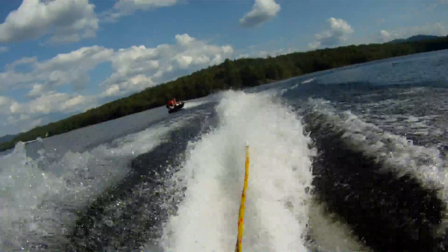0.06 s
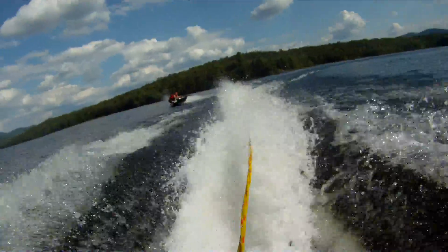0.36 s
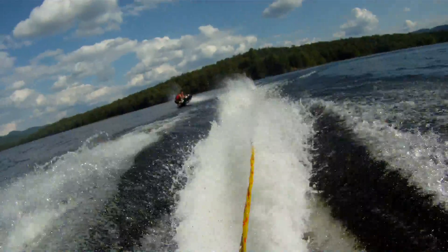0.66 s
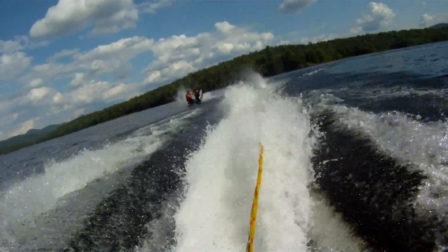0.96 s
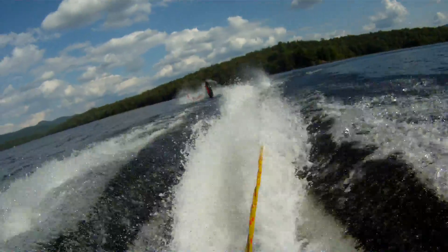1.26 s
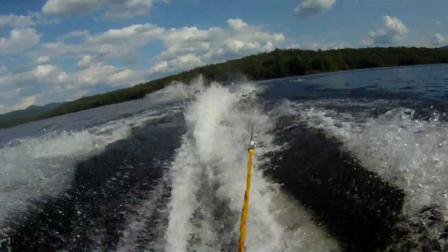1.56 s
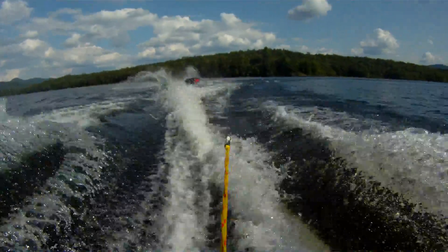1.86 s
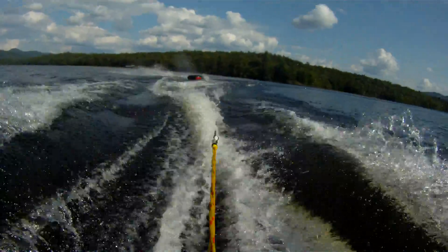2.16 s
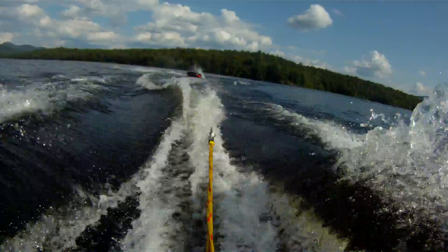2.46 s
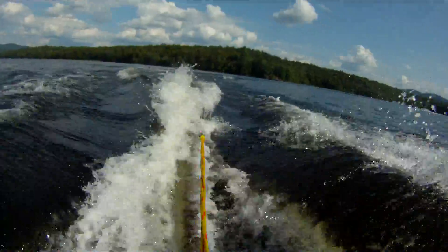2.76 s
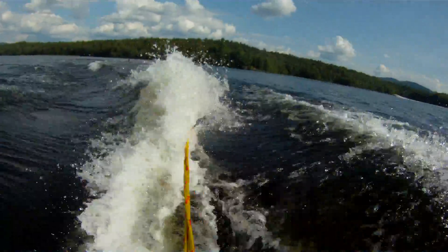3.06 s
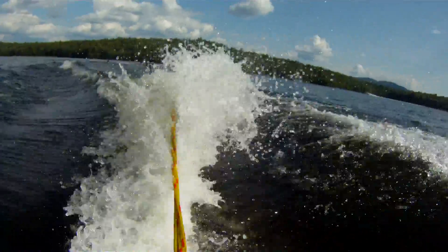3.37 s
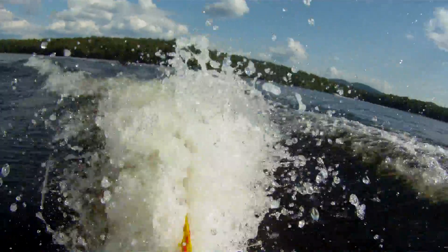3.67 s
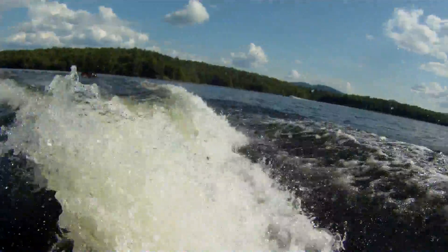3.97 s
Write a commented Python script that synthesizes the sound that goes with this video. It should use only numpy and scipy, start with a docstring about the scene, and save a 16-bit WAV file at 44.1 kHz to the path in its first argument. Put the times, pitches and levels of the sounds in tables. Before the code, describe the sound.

A personal watercraft roars at full throttle, eases off, and drones low over churning water.

```python
"""A personal watercraft runs on a lake, heard from a cased camera on its stern. At full throttle, engine and
jet roar over a hull drone, overloading the microphone; the case rattles once a shaft turn. At 0.65 s the craft
leans into a turn. Near 1.3 s the throttle closes: uneven firings burble in the wet exhaust, the wake washes and
slaps the hull, spray fizzes. From 2.3 s the engine picks up, reaching a low drone by 3.5 s while the plume
churns and drops tap the case."""
import sys
import numpy as np
from scipy.fft import rfft, irfft, next_fast_len
from scipy.io import wavfile
from scipy.ndimage import uniform_filter1d, map_coordinates

SR = 44100
rng = np.random.default_rng(int(sys.argv[2]) if len(sys.argv) > 2 else 0)


def store_pcm(level_fs):
    """Save levels as 16-bit WAV."""
    pcm = np.round(np.clip(level_fs, -1, 1) * 32767).astype(np.int16)
    wavfile.write(sys.argv[1], SR, np.atleast_2d(pcm).T)


N = 176400
TIME_S = np.arange(N) / SR

# Engine speed, full throttle and after. Each row: time in seconds, firing rate in Hz.
FIRING_FAST_HZ = [(0.1, 160.2), (0.2, 161.3), (0.3, 162.4), (0.42, 162.8), (0.55, 162.4), (0.68, 160.5),
                  (0.95, 159.3), (1.1, 157.6), (1.18, 154.8), (1.24, 149.5), (1.29, 145.7)]
FIRING_SLOW_HZ = [(1.34, 144), (1.4, 100), (1.49, 80), (1.6, 63), (1.8, 50), (2.05, 45.8), (2.25, 45.2),
                  (2.5, 51), (2.8, 54.5), (3.1, 62), (3.3, 69.6), (3.5, 83), (3.72, 82), (4, 82.4)]

# Envelopes. Each row: time in seconds, level in dB.
ROAR_DB = [(0, -19), (.332, -23), (.576, -20), (1.225, -20), (1.28, -20), (1.32, -26), (1.42, -35)]
RATTLE_DB = [(0, -47), (.15, -42.5), (.28, -40), (.5, -38), (.62, -48), (1.25, -61), (1.35, -77)]
FIRING_NOTE_DB = [(0, -22.5), (.45, -23), (1.1, -25.5), (1.26, -36), (1.35, -32.5), (1.43, -28.5),
                  (1.5, -29), (1.58, -50), (1.75, -46), (2.1, -57), (2.7, -50), (3.25, -37.5), (3.5, -29.5),
                  (3.75, -26.5), (4, -26.5)]
HULL_DB = [(0, -22), (.5, -23.5), (.65, -21), (1.25, -20), (1.31, -25), (1.38, -54), (1.6, -92)]
HOWL_DB = [(0, -32), (.11, -28), (.22, -35), (.42, -32), (.53, -34), (.61, -24.5), (.71, -24), (1.1, -24),
           (1.21, -22.5), (1.29, -26.5), (1.34, -40), (1.45, -70)]
PICKUP_DB = [(1.3, -77), (1.42, -40.5), (1.52, -39), (1.65, -61), (3, -74), (3.3, -51), (3.55, -38),
             (4, -41)]
CHURN_DB = [(0, -65), (1.3, -60), (1.7, -53), (2.6, -44), (3.2, -39.5), (3.6, -34.5), (4, -36)]
# Water envelopes. Each row: time in seconds, level in dB relative to the layer's gain.
WASH_DB = [(1.45, -37.5), (1.78, -41.5), (2.45, -41), (4, -35)]
SPRAY_DB = [(1.45, -48.5), (2.18, -52), (2.59, -50.5), (3.36, -46.5), (4.0, -50.5)]

# Noise spectra. Each row: frequency in Hz, relative level in dB.
ROAR_SPECTRUM = [(650, -31), (1100, -8), (1270, -24), (1620, 3), (1830, -4.5), (2230, 1.5), (2410, -2.5),
                 (2610, -2), (2880, -9.5), (3440, -14.5), (3840, -13.5), (4150, -16.5), (4790, -18.5),
                 (6200, -22.5), (7400, -29.5), (7950, -22.5), (9000, -30.5), (12800, -38.5), (14700, -39),
                 (15500, -44)]
ROAR_BODY_SPECTRUM = [(35, -30), (70, -26), (130, -10), (200, -8), (300, -16.5), (370, -16.5), (470, 5),
                      (560, -4), (650, -15), (880, 0), (1100, -8), (1400, -5)]
RATTLE_SPECTRUM = [(2000, -16), (4000, -3), (6500, 1), (8500, -10), (9700, 2.5), (10800, -9), (12000, -8.5),
                   (13000, -17), (15500, -18)]
BOOM_SPECTRUM = [(30, -23), (55, -21), (74, -0.5), (90, -4), (105, -6), (130, -14), (170, -10)]
CASE_TAP_SPECTRUM = [(800, -12), (2200, 3), (3400, 0), (4400, -2), (5400, 2), (7000, -3), (15000, -18)]
WASH_SPECTRUM = [(160, -52), (280, -15), (331, -18), (386, -22), (480, 2), (552, -4), (589, -2), (620, -38),
                 (742, 2), (791, -11.5), (854, -1.5), (959, -6.5), (1210, -9), (1360, -9.5), (1500, -1),
                 (1650, 7.5), (1820, -8.5), (1990, 1), (2130, -2), (2330, -1.5), (2610, -1.5), (2890, -16),
                 (3550, -11), (4140, -19.5), (4640, -16.5), (6000, -46), (7800, -50), (13200, -120)]
CHURN_SPECTRUM = [(150, -51), (300, -1), (400, -9.5), (850, 0.5), (1300, 1), (1620, 3), (1900, -2),
                  (2550, 2), (4000, -19)]
SPRAY_SPECTRUM = [(2940, -20), (5000, 0), (6100, -4), (7100, -6.5), (7800, -9), (10000, -10.5),
                  (11700, -12), (12600, -17), (14700, -17), (15500, -21)]

# Hull partials. Each row: shaft multiple, gain in dB on the level run, gain in dB leaning into the turn.
HULL_PARTIALS = [(1, -9.5, -9.5), (3, -9.5, -9.5), (4, -20.5, -27), (5, -21, -22), (7, -12, -13.5),
                 (8, -24, -20), (9, -19, -14), (10, -14, -17.5), (11, -10, -18.5), (13, -11.5, -20),
                 (14, -17, -17.5), (15, -33, -17.5), (17, -23, -19), (20, -26, -12.5)]
# Low drone at mid speed. Each row: multiple of the firing rate, gain in dB.
PICKUP_PARTIALS = [(2, 1.5), (3, -10.5), (4, -11), (5, -16.5), (6, -6.5), (10, -20)]
# Flares of the case resonance. Each row: centre in seconds, level in dB.
FLARES = [(.91, -18), (1.294, -18.5)]
# Off-throttle exhaust. Each row: time in seconds, burble level in dB, boom level in dB.
EXHAUST_DB = [(1.2, -55, -70), (1.33, -31, -53), (1.5, -40.5, -31.5), (1.65, -42, -42.5), (1.9, -35, -36),
              (2.42, -34.5, -36.5), (2.6, -42, -37), (3.1, -45, -38), (3.35, -44.5, -45),
              (3.55, -40.5, -42), (4, -54, -38)]
# Exhaust pipe modes. Each row: frequency in Hz, width in Hz, gain in dB.
PIPE_MODES = [(167, 23, 4.5), (231.6, 17.8, 2), (479.6, 49, -8.5), (744, 19, -27)]
# Scatter of firing strength. Each row: time in seconds, spread in dB.
FIRING_SPREAD_DB = [(1.3, -0.5), (1.7, 2.5), (2.9, -2.5), (3.5, 13)]
# Wake slaps on the hull. Each row: centre in seconds, rise of the wash in dB.
SLAPS = [(1.54, 1.5), (1.82, 2), (2.11, 4), (2.32, 2), (2.46, 4), (2.57, 3.5), (2.67, 2.5), (2.98, 2.5),
         (3.04, 3)]
# Drops on the case. Each row: start in seconds, peak in dB, treble edge in Hz.
DROPS = [(1.7298, -21.5, 7500), (3.138, -32, 15000), (3.318, -27, 8000), (3.4055, -17, 5900),
         (3.437, -27, 6000)]
# Peaks and hollows of the case. Each row: centre in Hz, width in Hz, gain in dB.
CASE_BANDS = [(1230, 45, 2), (2450, 45, -6), (3630, 110, 3), (4750, 130, 2), (6600, 200, -3),
              (8100, 160, -3), (9300, 300, -3.5), (11000, 220, -4)]
# Jet pump whine. Each row: shaft multiple, gain in dB.
PUMP_PARTIALS = [(49, -24), (60, -26)]


def amp(db):
    """Decibels to gain."""
    return 10 ** (np.asarray(db) / 20)


def unit(x):
    """x at rms 1."""
    return x / np.sqrt(np.mean(x ** 2) + 1e-20)


def curve(rows, column=1):
    """One column of a timed table, per sample."""
    rows = np.array(rows)
    return np.interp(TIME_S, rows[:, 0], rows[:, column])


def wobble(rate_hz):
    """Smooth random curve with knots at rate_hz."""
    return map_coordinates(rng.standard_normal(int(N * rate_hz / SR) + 4), [TIME_S * rate_hz])


def bell(offset, width):
    """Gaussian of height 1."""
    return np.exp(-(offset / width) ** 2)


def step(at_s, width_s):
    """Smooth rise from 0 to 1."""
    return .5 + .5 * np.tanh((TIME_S - at_s) / width_s)


def filtered(x, response):
    """x through a frequency response."""
    size = next_fast_len(N + SR // 2)
    return irfft(rfft(x, size) * response(np.fft.rfftfreq(size, 1 / SR)), size)[..., :N]


def coloured(x, spectrum):
    """x shaped by a spectrum, steep skirts beyond its ends, rms 1."""
    points_hz, db = np.transpose(spectrum)
    skirt = lambda hz: np.minimum(1, np.minimum(hz / points_hz[0], points_hz[-1] / (hz + 1))) ** 4
    shape = lambda hz: amp(np.interp(np.log(hz + 1), np.log(points_hz), db))
    return unit(filtered(x, lambda hz: skirt(hz) * shape(hz)))


def noise(spectrum):
    """Coloured noise, rms 1."""
    return coloured(rng.standard_normal(N), spectrum)


def once_a_turn(turns, at_turns, width_turns):
    """Bell window at one place in each shaft turn."""
    return bell((turns - at_turns + .5) % 1 - .5, width_turns)


def turn_scatter(turns, spread_db):
    """One random gain per shaft turn."""
    return amp(spread_db * rng.standard_normal(1000))[turns.astype(int)]


def partial(cycles, multiple, waver_db):
    """Sine locked to a multiple of a phase; level wavers, rms near 1."""
    sine = np.sqrt(2) * np.sin(2 * np.pi * (multiple * cycles + rng.random()))
    return sine * amp(waver_db * wobble(9.12))


def roar(turns, loose_turns):
    """Engine and jet rush; the overloaded mic cuts out twice a turn, deep then shallow, and snaps back."""
    cutout_turns, second_at_turns = .06, .283
    deep = (1 - .92 * once_a_turn(loose_turns, 0, cutout_turns)) ** 2
    shallow = 1 - .22 * once_a_turn(loose_turns, second_at_turns, cutout_turns)
    swell_db = np.cos(2 * np.pi * (loose_turns - .025))
    gate = deep * shallow * amp(swell_db)
    buzz = sum(amp(-15 - .08 * (k - 18)) * partial(turns, k, waver_db=2) for k in range(18, 34))
    whine = sum(amp(db) * partial(turns + .0063 * wobble(160), k, waver_db=2) for k, db in PUMP_PARTIALS)
    jet = noise(ROAR_SPECTRUM) * amp(1.9 * wobble(500) + .24 * wobble(24.5))
    rush = unit(gate * (jet + buzz + whine))
    snaps = sum(once_a_turn(loose_turns, at + cutout_turns, .025) * turn_scatter(turns, spread_db=2)
                for at in (0, second_at_turns))
    rush += amp(-20) * unit(snaps * noise(CASE_TAP_SPECTRUM))
    treble = filtered(rush, lambda hz: hz ** 6 / (hz ** 6 + 3300 ** 6))
    rush += (amp(-2.5 * step(at_s=1.26, width_s=.02)) - 1) * treble  # dulls as the throttle closes
    body = amp(-7) * gate * noise(ROAR_BODY_SPECTRUM)
    release_db = 102 * np.maximum(0, TIME_S - ROAR_DB[-1][0])
    return amp(curve(ROAR_DB) - release_db) * (rush + body)


def drone(turns):
    """Shaft-locked tones: firing note, hull partials that shift as the craft leans into a turn, howl, pickup
    drone."""
    note = amp(curve(FIRING_NOTE_DB)) * partial(turns, 2, waver_db=.26)
    lean = step(at_s=.65, width_s=.052)
    hull = sum(amp(upright_db + lean * (leaning_db - upright_db)) * partial(turns, k, waver_db=min(2, .42 * k))
               for k, upright_db, leaning_db in HULL_PARTIALS)
    howl = amp(curve(HOWL_DB)) * partial(turns, 6, waver_db=2)
    pickup = sum(amp(db) * partial(turns, 2 * k, waver_db=1.5) for k, db in PICKUP_PARTIALS)
    return note + amp(curve(HULL_DB)) * hull + howl + amp(curve(PICKUP_DB)) * pickup


def flares(pitch_hz=1634, width_s=.01):
    """The case's main resonance swells briefly in the roar."""
    envelope = sum(amp(db) * bell(TIME_S - at_s, width_s) for at_s, db in FLARES)
    return envelope * partial(pitch_hz * TIME_S + .33 * wobble(200), 1, waver_db=1)


def rattle(turns, loose_turns):
    """The case rattles once a turn, just after the mic's deep cutout."""
    bursts = turn_scatter(turns, spread_db=2.5) * once_a_turn(loose_turns, at_turns=.19, width_turns=.06)
    return amp(curve(RATTLE_DB)) * unit(bursts * noise(RATTLE_SPECTRUM))


def pipe_response(hz):
    """Exhaust pipe modes of alternating sign, high-passed at 110 Hz."""
    modes = sum((-1) ** k * amp(db) * 1j * hz * width_hz / (mode_hz ** 2 - hz ** 2 + 1j * hz * width_hz)
                for k, (mode_hz, width_hz, db) in enumerate(PIPE_MODES))
    return modes * hz ** 2 / (hz ** 2 + 110 ** 2)


def burble(turns, firing_hz, jitter_s=.0007):
    """Uneven firings and gurgling water ring the exhaust pipe."""
    firings = np.flatnonzero(np.diff(np.floor(2 * turns)))
    size, lag = np.clip(rng.standard_normal((len(firings), 2)), -1.7, 1.7).T
    strength = amp(curve(FIRING_SPREAD_DB)[firings] * size) / np.sqrt(firing_hz[firings])
    onsets = np.clip(firings + (lag * jitter_s * SR).astype(int), 0, N - 1)
    puffs = unit(np.bincount(onsets, strength, N))
    gurgle = .52 * rng.standard_normal(N)
    ring = filtered(puffs + gurgle, pipe_response)
    running_rms = np.sqrt(np.abs(uniform_filter1d(ring ** 2, size=6615)) + 1e-12)  # 150 ms
    return amp(curve(EXHAUST_DB)) * ring / running_rms


def boom(pitch_hz=86.912, drift_cycles=.1552):
    """Hollow exhaust boom: a drifting tone over rumble."""
    tone = partial(pitch_hz * TIME_S + drift_cycles * wobble(12), 1, waver_db=2.5)
    rumble = amp(-2) * noise(BOOM_SPECTRUM)
    return amp(curve(EXHAUST_DB, column=2)) * unit(tone + rumble)


def wash(gain_db=5, slap_s=.015):
    """The wake washes through the case's resonances and slaps the hull."""
    slaps_db = sum(db * bell(TIME_S - at_s, slap_s) for at_s, db in SLAPS)
    flutter_db = .75 * wobble(40) + .88 * wobble(200)
    return amp(gain_db + curve(WASH_DB) + slaps_db + flutter_db) * noise(WASH_SPECTRUM)


def churn():
    """The plume churns behind the stern."""
    return amp(curve(CHURN_DB) + 1.7 * wobble(60)) * noise(CHURN_SPECTRUM)


def drops(decay_s=.0014):
    """Single drops tap the case; fatter ones are duller."""
    taps = np.zeros(N)
    for start_s, peak_db, edge_hz in DROPS:
        age_s = TIME_S - start_s
        impact = rng.standard_normal(N) * (age_s >= 0) * np.exp(-np.abs(age_s) / decay_s)
        tap = filtered(coloured(impact, CASE_TAP_SPECTRUM), lambda hz: .25 + 1 / (1 + (hz / edge_hz) ** 20))
        taps += amp(peak_db) * tap / np.abs(tap).max()
    return taps


def spray(gain_db=1.5):
    """Fine spray fizzes."""
    fizz = unit(noise(SPRAY_SPECTRUM) * amp(1.1 * wobble(900) + .56 * wobble(30.25)))
    return amp(gain_db + curve(SPRAY_DB)) * fizz


def case_response(hz):
    """The housing's narrow peaks and hollows."""
    return amp(sum(db * bell(hz - centre_hz, width_hz) for centre_hz, width_hz, db in CASE_BANDS))


def scene():
    """Engine and water through the case, mono; two firings a shaft turn."""
    firing_hz = curve(list(FIRING_FAST_HZ) + list(FIRING_SLOW_HZ))
    turns = np.cumsum(firing_hz) / SR / 2
    loose_turns = turns + .024 * wobble(90)  # timing jitter shared by mic cutouts and rattle
    engine = roar(turns, loose_turns) + drone(turns) + flares() + rattle(turns, loose_turns)
    exhaust = burble(turns, firing_hz) + boom()
    water = wash() + churn() + drops() + spray()
    return filtered(engine + exhaust + water, case_response)


def record(dry):
    """The camera adds faint stereo hiss and cuts above 15.6 kHz."""
    hiss = amp(-70.5) * rng.standard_normal((2, N))
    return filtered(dry + hiss, lambda hz: hz < 15600)


dry = scene()
out = record(dry)
store_pcm(out)
```